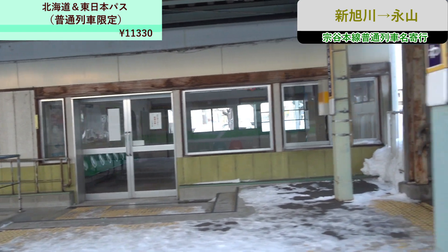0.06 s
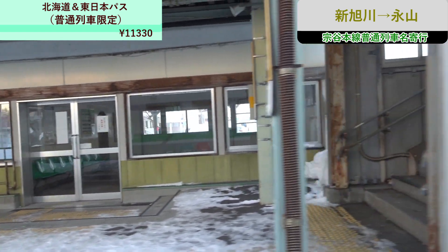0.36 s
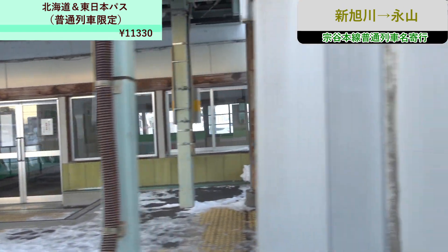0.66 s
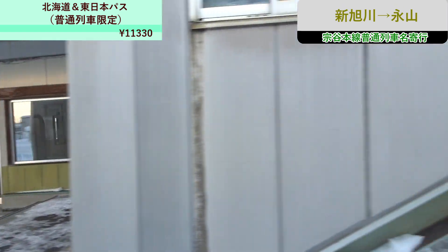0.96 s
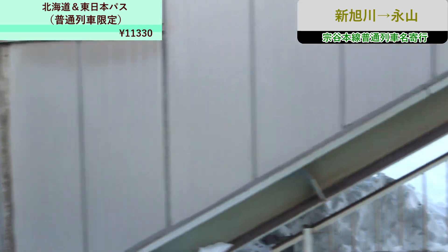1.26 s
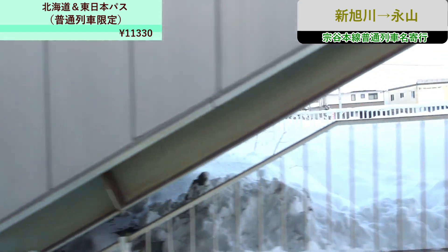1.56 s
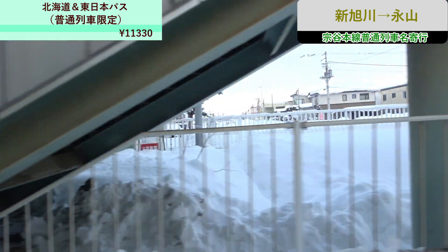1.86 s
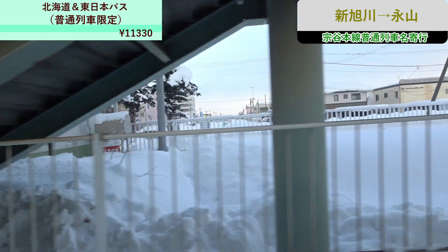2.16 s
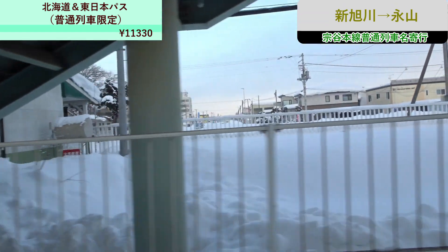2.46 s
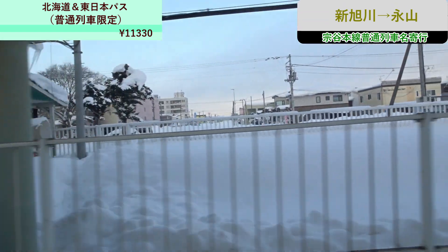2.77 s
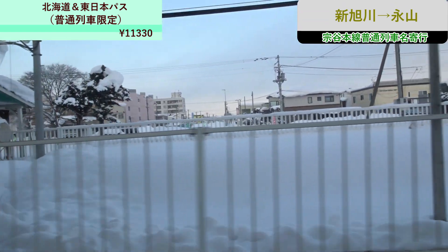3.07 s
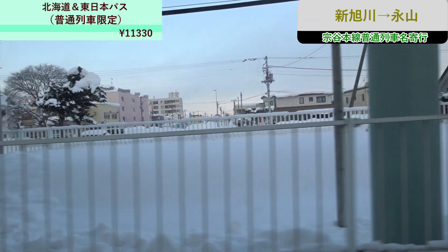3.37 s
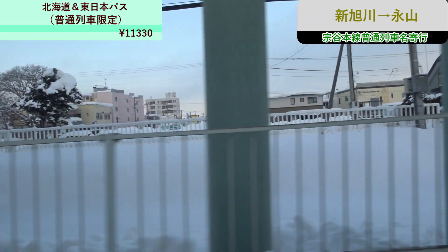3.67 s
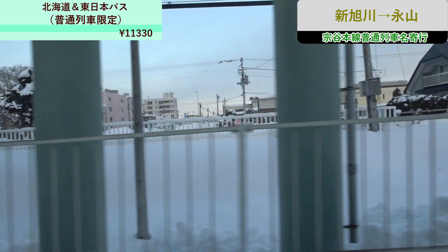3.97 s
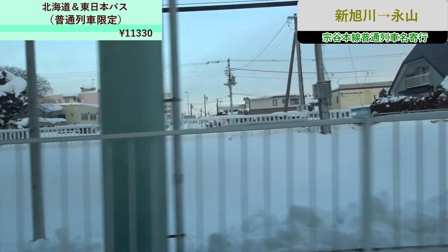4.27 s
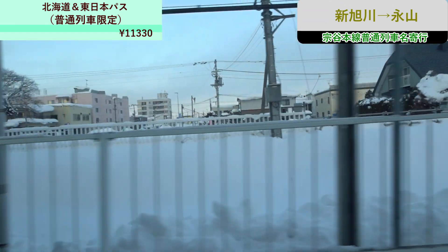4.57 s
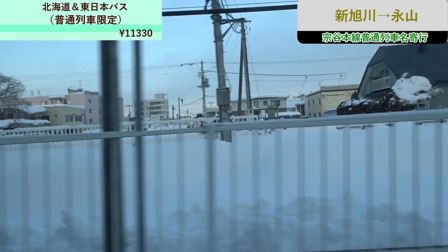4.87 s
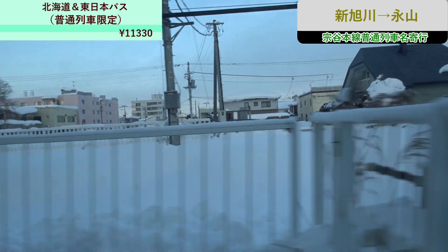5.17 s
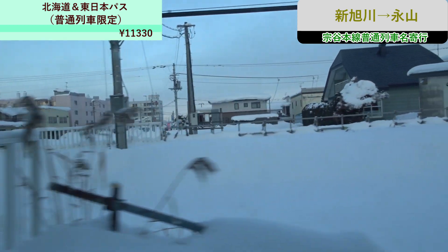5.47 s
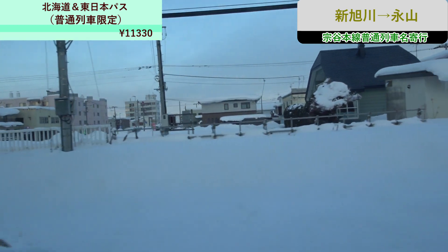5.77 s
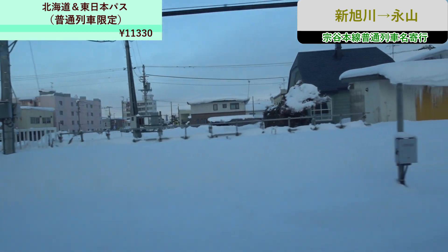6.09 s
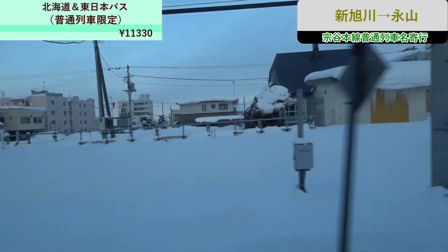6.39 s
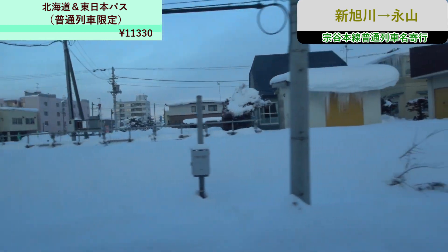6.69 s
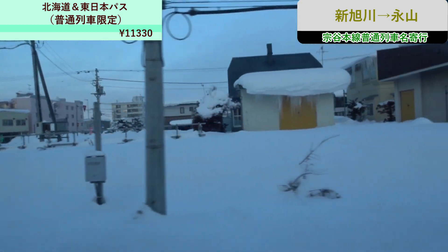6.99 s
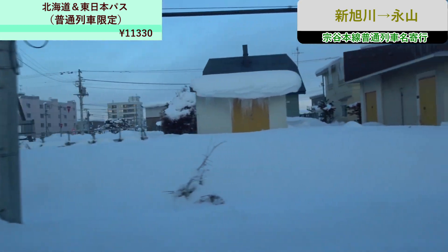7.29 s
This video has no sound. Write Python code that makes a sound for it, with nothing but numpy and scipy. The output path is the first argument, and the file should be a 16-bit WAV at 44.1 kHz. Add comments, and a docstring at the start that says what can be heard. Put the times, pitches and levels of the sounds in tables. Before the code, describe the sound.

A diesel train's engine pulls steadily, heard from a passenger seat in the cabin. After a short hiss at the very start, its deep drone booms and throbs, sagging only slightly in pitch and turning more fluttery. Track rumble swells and sinks underneath, along with the hum of fan and pumps. One faint, thin squeal comes and goes, and a quiet turbocharger whistle rises slowly throughout.

```python
"""A deep, throbbing drone, opening with a brief hiss: inside a diesel railcar gathering speed.
The six-cylinder engine under the floor pulls at nearly constant speed. Its tones, called orders, are
whole multiples of its cycle rate (one cycle is two turns of the crank), and they boom in the cabin.
Combustion clatter, rolling noise, belt-driven fan and pumps and a low hum lie under the drone.
One thin squeal swells and fades, and a faint turbocharger whistle climbs past a steady whine."""
import sys
import numpy as np
from scipy import signal
from scipy.fft import rfft, irfft
from scipy.io import wavfile

SR = 44100
rng = np.random.default_rng(int(sys.argv[2]) if len(sys.argv) > 2 else 0)


def wrap_up_sound(samples):
    """Save the sound to the file named by the first command line argument, as 16-bit audio."""
    columns = np.atleast_2d(samples).T
    # keep every value between -1 and 1, then stretch to whole-number steps
    tamed = np.clip(columns, -1, 1)
    steps = np.round(tamed * 32767).astype(np.int16)
    wavfile.write(sys.argv[1], SR, steps)


N = 332514
TIME = np.arange(N) / SR


# the engine's strong tones: order, level pulling away/dB, level under way/dB, left minus right/dB
ENGINE_TONES = [(2, -50, -48.5, 0.5), (3, -53, -52.5, 1.5), (4, -49.5, -59, 0), (5, -35.5, -39.5, 0.5),
                (6, -32, -32.5, 1.5), (7, -24.5, -31, .5), (8, -34.5, -49, 3), (9, -31, -25.5, -0.5),
                (10, -39, -29.5, 2.5), (11, -33.5, -32, -1), (12, -14, -15, 0.5), (13, -37, -23, 4.5),
                (14, -34, -40, 9), (15, -28, -29.5, 2), (16, -28, -36, -1.5), (17, -29.5, -30, -5.5),
                (18, -22.5, -21.5, 0), (19, -40, -38, 3.5), (20, -33, -38.5, 2), (21, -43.5, -41, -6),
                (22, -38.5, -37.5, 3.5), (23, -40, -46, 4), (24, -37.5, -39.5, 4.5), (25, -40, -45, -9.5),
                (26, -35, -47, -0.5), (27, -43, -49, -6.5), (28, -40.5, -51, -3), (29, -43, -43, -13.5),
                (30, -36, -30.5, -6), (31, -47.5, -45.5, 5), (33, -42.5, -49.5, 2), (36, -48, -54.5, -4),
                (37, -49.5, -47.5, -5.5), (39, -44, -53, -7), (44, -49, -55, 1), (45, -46.5, -45, -11),
                (48, -54.5, -48.5, 6), (57, -49.5, -47, -5), (72.4, -54, -50.5, -8)]


def engine_drone(cycle, rpm):
    """Unequal cylinders sound many orders; the cabin favours different ones as the speed sags."""
    pulling_rpm, under_way_rpm = 2142, 2102
    main_order, node_rpm, node_width_rpm = 12, 2126, 9
    under_way = np.clip((pulling_rpm - rpm) / (pulling_rpm - under_way_rpm), 0, 1)
    out, phase = np.zeros((2, N)), 0
    for order, early_db, late_db, pan_db in ENGINE_TONES:
        order = round(order)
        # six firings a cycle: multiples of six boom and hold firm, the others waver
        waver_db = 0.23 * drift(3) if order % 6 == 0 else 1.23 * drift(0.83)
        level_db = early_db + (late_db - early_db) * under_way
        gain = from_db(level_db + crossing_db(order, rpm) + waver_db)
        # the body smears each cycle's thump, but the main order's two neighbours stay locked to it
        free = order not in (main_order, main_order + 1)
        phase += free * 1.32 * rng.standard_normal()
        phase -= .3 * (order - main_order)   # upper orders arrive later
        if order == main_order + 1:
            # this one crosses a node (a quiet spot) of the cabin and flips: throb turns to flutter
            gain = gain * np.tanh((rpm - node_rpm) / node_width_rpm)
        hz = order * cycle_hz(rpm.mean())
        out += stereo_tone(order * cycle + phase, hz, gain, pan_db, scatter=1.9)
    return out


# the cabin's loud and quiet spots: order, drop below full speed/rpm, half width/rpm, level change/dB
CROSSINGS = [(5, 78, 13, -9.5), (7, 66, 19, 3.5), (12, 6.4, 21.2, -4.5), (15, 34.6, 6.4, -14),
             (17, 31, 4, -11), (18, 44, 13, -4), (29, 8, 12, 8.5), (30, 35, 11, -9), (39, 6.4, 10, 6),
             (45, 16, 24, -10), (57, 14.6, 5.8, 8), (57, 77, 7, 1.5)]


def crossing_db(order, rpm, full_rpm=2175):
    """An order swells or sinks as the engine speed carries it over a cabin resonance or node."""
    return sum(change_db * np.exp(-((full_rpm - rpm - drop) / half_width) ** 2)
               for which, drop, half_width, change_db in CROSSINGS if round(which) == order)


# how strong the orders too weak to boom are: f/Hz, base level/dB
BUZZ_LEVELS = [(580, -49), (750, -54.5), (1000, -55.5), (1300, -59), (1700, -71)]


def engine_buzz(cycle, rpm):
    """The weak upper orders fade in and out among the cabin's crowded resonances."""
    out = np.zeros((2, N))
    strong = [round(row[0]) for row in ENGINE_TONES]
    for order in range(34, 90):
        if order not in strong:
            hz = order * cycle_hz(rpm.mean())
            gain = from_db(at_hz(BUZZ_LEVELS, hz) - 6.5 + 5 * drift(0.6))
            angle = order * cycle + rng.uniform(0, 2 * np.pi)
            out += stereo_tone(angle, hz, gain, pan_db=rng.normal(0, 2), scatter=1.0)
    return out


# the three moments at which the belt tones' levels are given: t/s
BELT_TIMES = (1, 3.7, 6.5)
# fan and pump tones: multiple of the cycle rate, level/dB at each of those moments, left minus right/dB
BELT_TONES = [(17.28, -46.5, -45.5, -48, -4), (17.9, -46.5, -49.5, -43.5, 0),
              (18.28, -45.5, -51, -30, -3.5), (23.75, -45, -40, -44.5, 1.5), (26.73, -57.5, -53, -39, 4.5),
              (32.46, -41, -39, -48.5, -0.5), (44.5, -64, -50.5, -54, -2)]


def belt_drive(cycle, rpm):
    """Slightly slipping belts turn the fan and pumps at odd ratios, so they beat against the orders."""
    out = np.zeros((2, N))
    for ratio, *levels_db, pan_db in BELT_TONES:
        level_db = np.interp(TIME, BELT_TIMES, levels_db) + 2.3 * drift(1.1)
        angle = ratio * cycle + rng.uniform(0, 2 * np.pi)
        slip = .4 * drift(0.98)
        hz = ratio * cycle_hz(rpm.mean())
        out += stereo_tone(angle + slip, hz, from_db(level_db), pan_db, scatter=2.5)
    return out


# how the track rumble swells and sinks: t/s, level change/dB
TRACK_RUMBLE = [(0, 6), (1.8, -1.5), (4, 2.5), (5.4, -12), (6.75, 5), (7.54, 4)]


def running_noise(cycle, settle_s=2.7):
    """Track and body rumble; clatter and hiss pulse with the six firings of each cycle."""
    strain = np.exp(-(TIME / settle_s) ** 2)   # the effort of starting dies away
    track_db, = in_time(TRACK_RUMBLE)
    firings = np.cos(6 * cycle)
    uneven_cylinders = np.cos(cycle) + np.cos(3 * cycle)
    pulse_db = 0.8 * firings + 0.41 * uneven_cylinders + 0.68 * drift(25)
    rumble = from_db(track_db) * cabin_noise(14, 110)
    roar = from_db(1.64 + 2 * strain) * cabin_noise(95, 650)
    clatter = from_db(-0.14 + 2 * strain) * cabin_noise(650, 3400)
    rasp = from_db(-3.5) * fade_in(at_s=6.25, rise_s=.15) * cabin_noise(2700, 3400)
    hiss = from_db(-2.5 + 7.5 * strain) * cabin_noise(3930, 5800)
    sizzle = from_db(0.5 + 1.5 * strain) * cabin_noise(5800, 9300)
    top_hiss = from_db(-9.5 + 11.5 * fade_in(at_s=2.6, rise_s=.3)) * cabin_noise(9300, 16000)
    return rumble + roar + from_db(pulse_db) * (clatter + rasp + hiss + sizzle + top_hiss)


# the cabin's noise, from bass to treble: f/Hz, base level in each hertz/dB
NOISE_LEVELS = [(25, -65), (50, -63.5), (80, -60.5), (130, -60.5), (210, -51.5), (290, -56), (370, -61),
                (520, -59.5), (640, -66.5), (1100, -68), (2100, -79), (3200, -77.5), (4200, -85),
                (6500, -90), (8500, -93.5), (10000, -99), (13000, -102), (15000, -107)]


def cabin_noise(low_hz, high_hz):
    """One band of the noise that fills the cabin, partly alike at the two ears."""
    hz = np.arange(N // 2 + 1) * SR / N + 1e-3
    band = 1 / np.sqrt((1 + (low_hz / hz) ** 10) * (1 + (hz / high_hz) ** 10))
    alike = np.clip(at_hz(EAR_LIKENESS, hz), 0, .999)
    shared, opposed = rfft(rng.standard_normal((2, N)))
    ears = np.array([[1], [-1]])
    stereo = np.sqrt(1 + alike) * shared + np.sqrt(1 - alike) * opposed * ears
    left_lead = np.exp(.5j * ears * at_hz(EAR_LIKENESS, hz, column=2))
    colour = from_db(at_hz(NOISE_LEVELS, hz) + panel_db(hz))
    return irfft(stereo * left_lead * band * colour, N) * np.sqrt(SR) / 2


# panels and fittings that ring in that noise: f/Hz, width/Hz, level change/dB
PANELS = [(315, 28, 4.5), (1020, 36, -0.5), (1800, 110, 3), (2228, 69, 4.5), (3360, 40, 2), (3500, 70, 1.5),
          (4150, 35, 7.5), (5670, 230, 1), (6400, 83, 3), (11500, 220, 4.5)]


def panel_db(hz):
    """A few strong panel resonances stand over a crowd of small ones."""
    strong = sum(resonance_db(hz, centre, width, peak_db) for centre, width, peak_db in PANELS)
    grid_hz = np.arange(0, SR / 2, 55)
    crowd = np.interp(hz, grid_hz, rng.standard_normal(len(grid_hz)))
    return strong + 1.1 * crowd * np.clip(hz / 2500, 0, 1)


# low tones under the floor: f/Hz, level/dB
FLOOR_HUM = [(58.5, -48), (119, -44.5)]


def floor_hum():
    """Two low tones waver gently in loudness, the same at both ears."""
    return sum(np.sqrt(2) * from_db(level_db + 2.2 * drift(0.94)) * np.sin(2 * np.pi * hz * TIME)
               for hz, level_db in FLOOR_HUM)


def squeal(peak_s=2.4, peak_db=-51, rise_db_per_s=16, fall_db_per_s=9, sag_hz_per_s=18):
    """A thin metallic tone swells, then fades more slowly; its pitch sags throughout."""
    since = TIME - peak_s
    level_db = peak_db + np.minimum(rise_db_per_s * since, -fall_db_per_s * since)
    return from_db(level_db) * whistle(hz=2900 - sag_hz_per_s * since, width_hz=12, steady=1.7)


# the turbocharger's rising pitch: t/s, f/Hz
TURBO_PITCH = [(0, 7940), (2.1, 8570), (3.5, 8950), (5.4, 9540), (6.55, 9790), (7.54, 9885)]
# pitches at which its air duct rings: f/Hz, level boost/dB
DUCT_RESONANCES = [(8270, 5.5), (8420, 7.5), (8720, 5.5), (8955, 13), (9180, 6), (9555, 9.5), (9765, 10),
                   (9885, 7)]


def turbocharger(base_db=-67.5, duct_width_hz=42):
    """The whistle climbs as the turbocharger spins up, flaring at each resonance of the duct."""
    hz, = in_time(TURBO_PITCH)
    flare_db = sum(resonance_db(hz, centre, duct_width_hz, db) for centre, db in DUCT_RESONANCES)
    return from_db(base_db + flare_db) * whistle(hz, width_hz=45, steady=.8)


def equipment_whine():
    """Equipment on board gives a faint, high whine at one pitch."""
    return from_db(-66.5) * whistle(hz=8270, width_hz=16, steady=.7)


def opening_hiss(length_s=0.044):
    """A short bright hiss dies away right at the start."""
    bright = np.diff(cabin_noise(3100, 16000), prepend=0)
    return from_db(12.5) * np.exp(-(TIME / length_s) ** 4) * bright


def whistle(hz, width_hz, steady):
    """A narrow tone, part steady and part breathy, that reaches each ear differently."""
    angle = 2 * np.pi * np.cumsum(hz * np.ones(N)) / SR
    ears = [(steady + drift(width_hz)) * np.cos(angle) + drift(width_hz) * np.sin(angle)
            for ear in range(2)]
    return np.array(ears) / np.sqrt(1 + steady ** 2 / 2)


# how alike the cabin sounds at the two ears: f/Hz, likeness (1 = the same), left ear's lead/rad
EAR_LIKENESS = [(60, 0.96, .05), (131, 0.94, 0.086), (211, 0.79, 0.3), (310, 1, 0.64), (537, 0.51, 0.9),
                (1300, 0.61, 0.11), (3100, 0.3, 0.11), (7000, 0.092, .05)]


def stereo_tone(angle, hz, gain, pan_db, scatter):
    """One tone at both ears; high tones tend to arrive more out of step."""
    unlike = max(1 - at_hz(EAR_LIKENESS, hz), 0)
    lead = at_hz(EAR_LIKENESS, hz, column=2) + scatter * unlike * rng.standard_normal()
    ears = np.array([[1], [-1]])
    wave = np.cos((angle + ears * lead / 2).astype(np.float32))
    return np.sqrt(2) * from_db(ears * pan_db / 2) * gain * wave


def resonance_db(hz, centre_hz, width_hz, peak_db):
    """A resonance acts most at its own pitch and less to either side."""
    return peak_db / (1 + (2 * (hz - centre_hz) / width_hz) ** 2)


def drift(rate_hz):
    """A smooth random wobble, typically about 1 in size."""
    step, warm_up = 40, 2000
    pole = np.exp(-2 * np.pi * rate_hz * step / SR)
    noise = rng.standard_normal(N // step + warm_up + 2)
    slow = signal.lfilter([1], [1, -2 * pole, pole * pole], noise)[warm_up:]
    return np.interp(np.arange(N) / step, np.arange(len(slow)), slow / slow.std())


def fade_in(at_s, rise_s):
    """A smooth step from 0 to 1."""
    return (1 + np.tanh((TIME - at_s) / rise_s)) / 2


def cycle_hz(rpm):
    """Engine cycles per second: each takes two turns of the crank."""
    return rpm / 120


def from_db(db):
    """Turn decibels into a multiplier."""
    return 10 ** (np.asarray(db) / 20)


def in_time(rows):
    """Join a table's points with straight lines, giving a value at every sample."""
    times, *columns = np.transpose(rows)
    return [np.interp(TIME, times, column) for column in columns]


def at_hz(rows, hz, column=1):
    """Read a table between its frequencies, with octaves evenly spaced."""
    rows = np.array(rows)
    return np.interp(np.log(np.maximum(hz, 1)), np.log(rows[:, 0]), rows[:, column])


# engine speed, sagging under load: t/s, speed/rpm
ENGINE_SPEED = [(0, 2172), (2.4, 2144), (2.8, 2138), (3.5, 2133), (4, 2125), (5.3, 2101), (6.5, 2070),
                (7.54, 2070)]


def scene():
    """Engine, belts, running noise and faint high tones, as heard at a window seat."""
    rpm, = in_time(ENGINE_SPEED)
    cycle = 2 * np.pi * np.cumsum(cycle_hz(rpm)) / SR   # an angle: one full circle per engine cycle
    cycle = cycle + .002 * drift(16)   # the crank never turns quite evenly
    machinery = engine_drone(cycle, rpm) + engine_buzz(cycle, rpm) + belt_drive(cycle, rpm)
    background = running_noise(cycle) + equipment_whine() + floor_hum()
    return machinery + background + turbocharger() + squeal() + opening_hiss()


def record(dry, cutoff_hz=15500):
    """The highest treble is cut steeply."""
    return signal.sosfilt(signal.ellip(10, .1, 80, cutoff_hz, fs=SR, output="sos"), dry)


dry = scene()
out = record(dry)
wrap_up_sound(out)
```